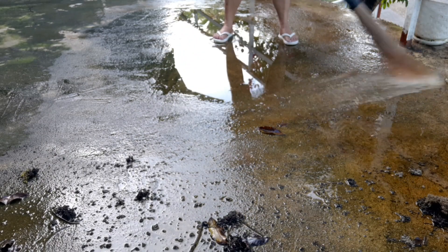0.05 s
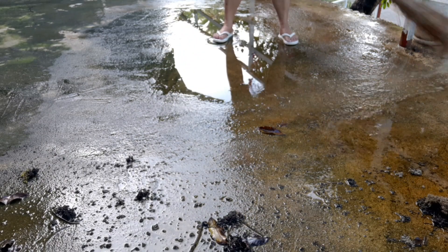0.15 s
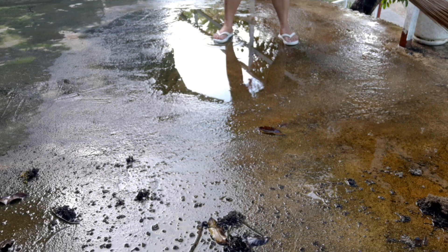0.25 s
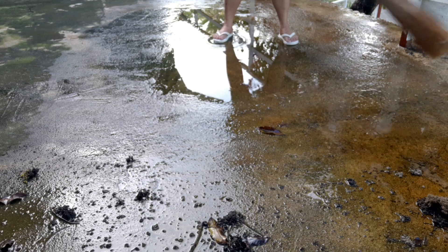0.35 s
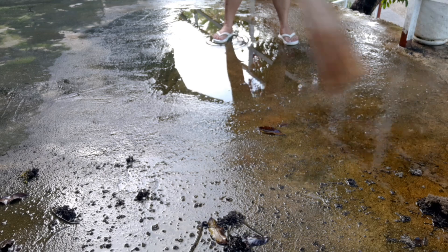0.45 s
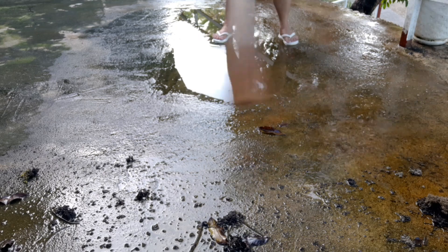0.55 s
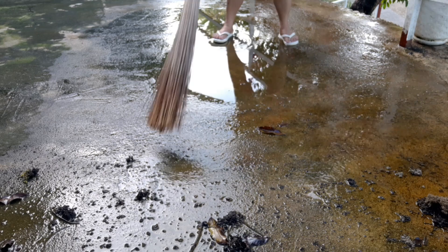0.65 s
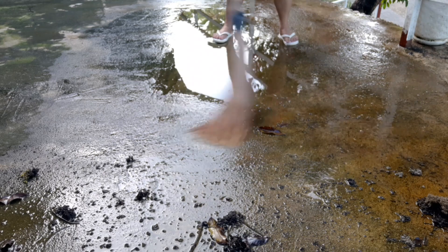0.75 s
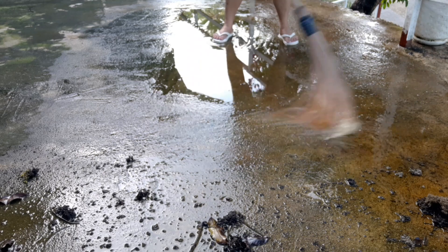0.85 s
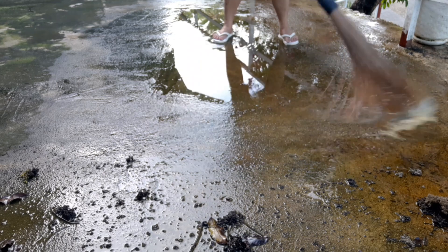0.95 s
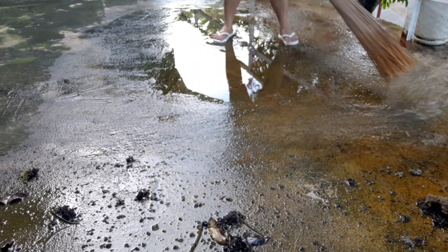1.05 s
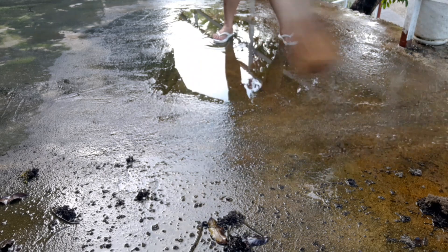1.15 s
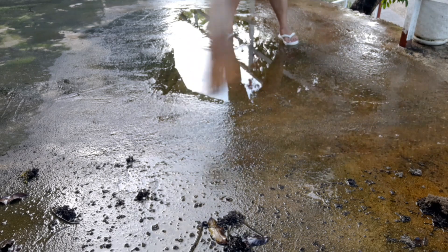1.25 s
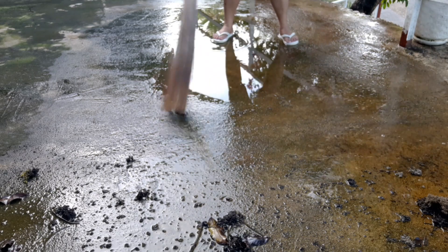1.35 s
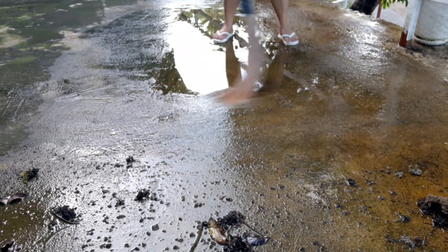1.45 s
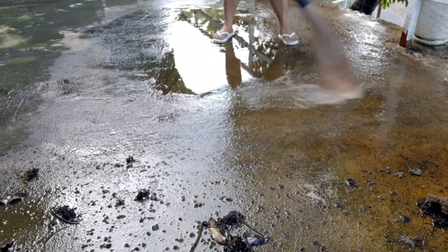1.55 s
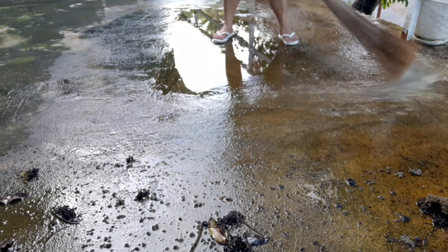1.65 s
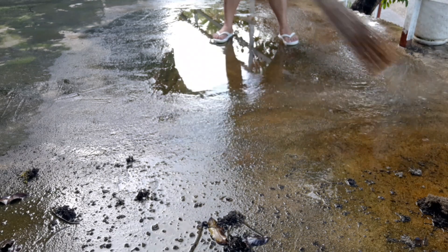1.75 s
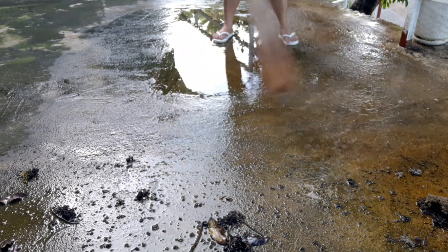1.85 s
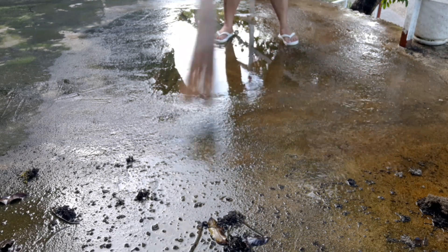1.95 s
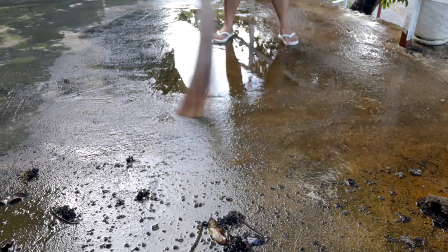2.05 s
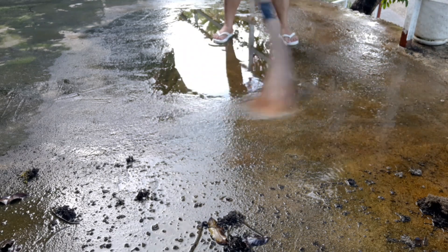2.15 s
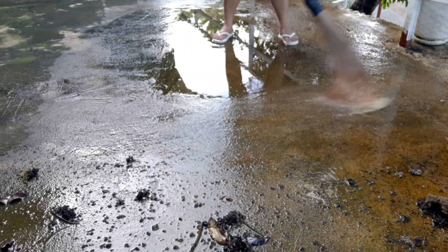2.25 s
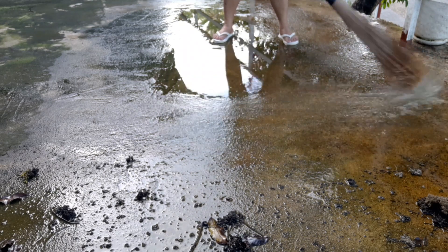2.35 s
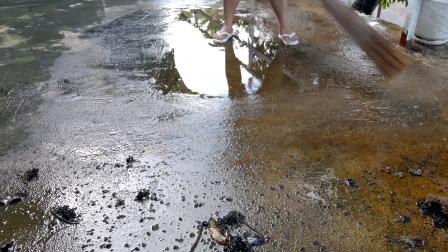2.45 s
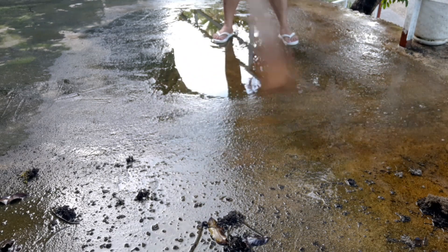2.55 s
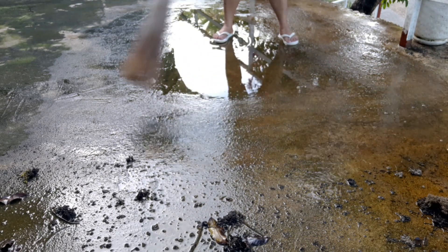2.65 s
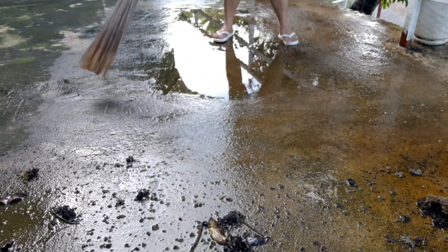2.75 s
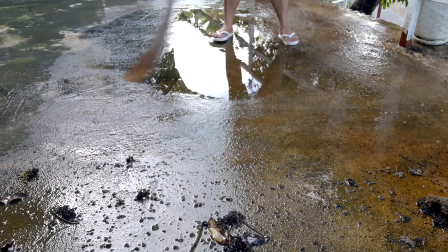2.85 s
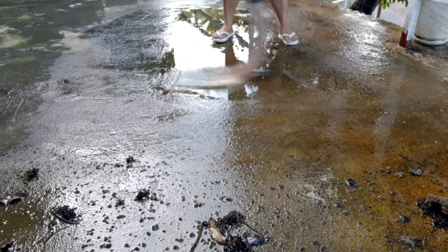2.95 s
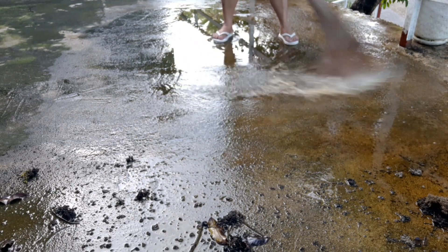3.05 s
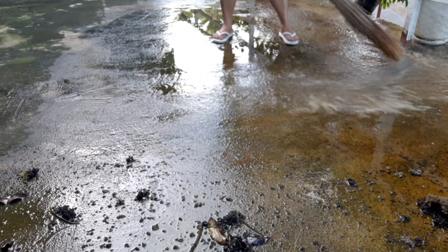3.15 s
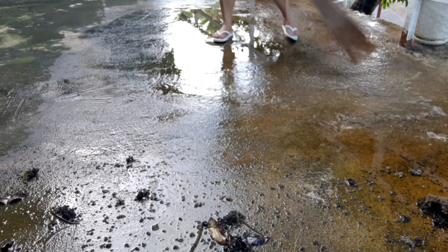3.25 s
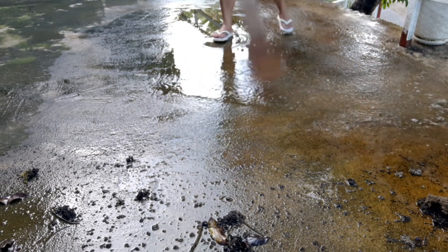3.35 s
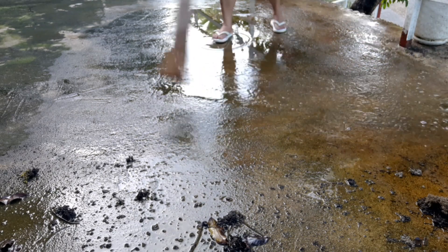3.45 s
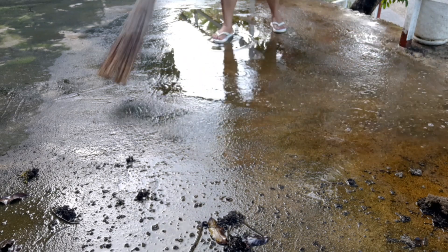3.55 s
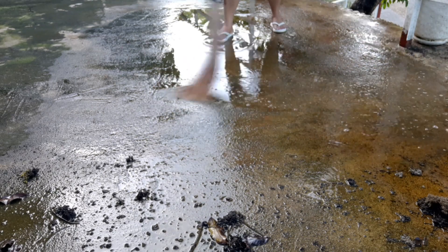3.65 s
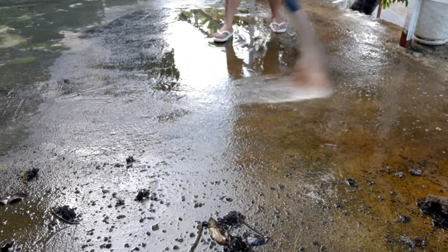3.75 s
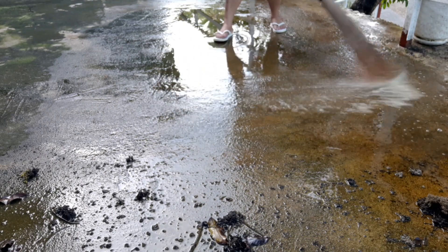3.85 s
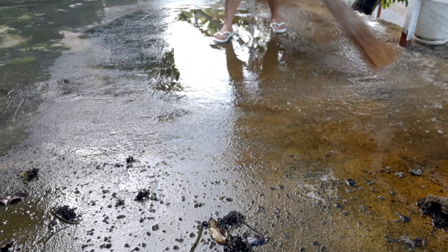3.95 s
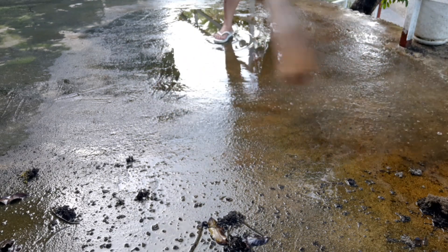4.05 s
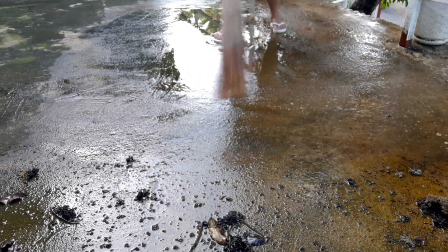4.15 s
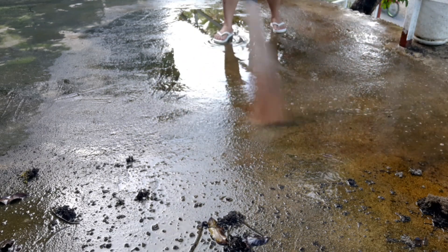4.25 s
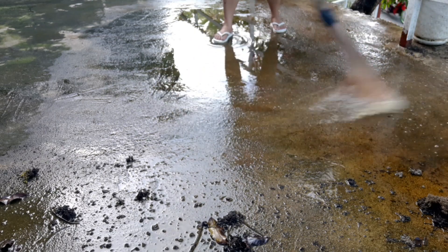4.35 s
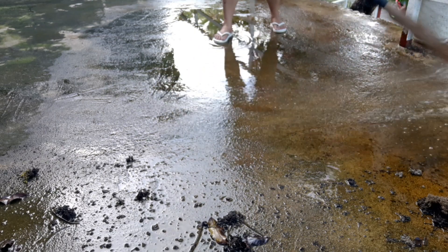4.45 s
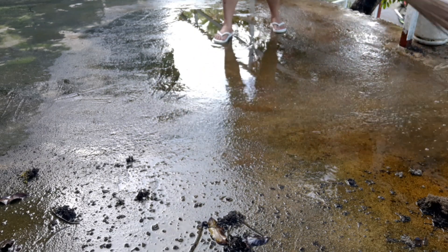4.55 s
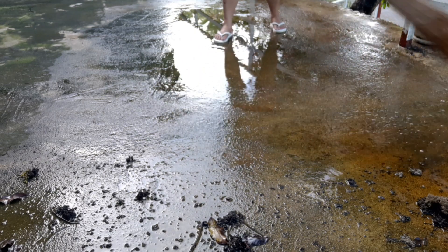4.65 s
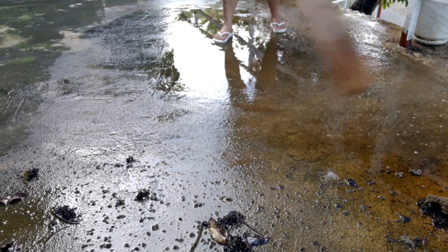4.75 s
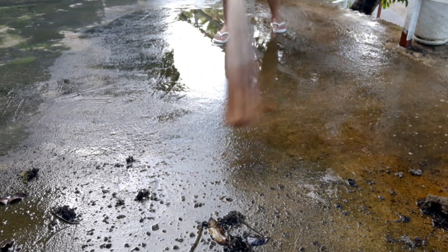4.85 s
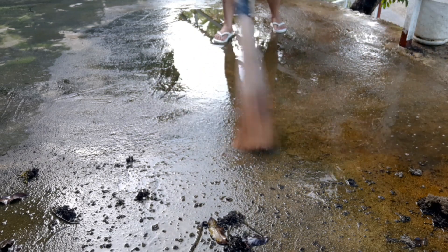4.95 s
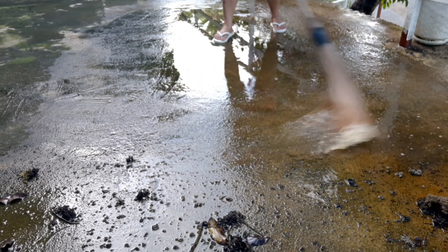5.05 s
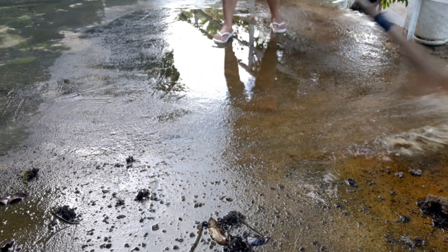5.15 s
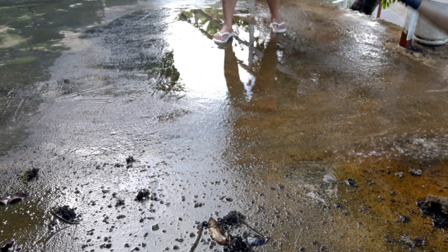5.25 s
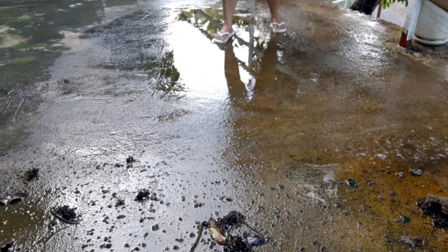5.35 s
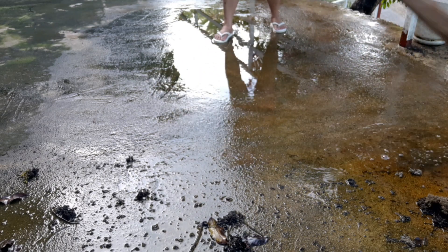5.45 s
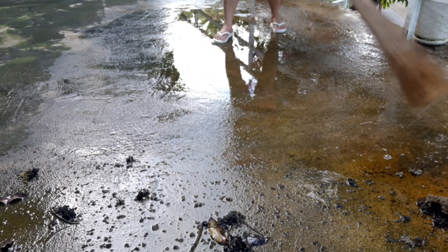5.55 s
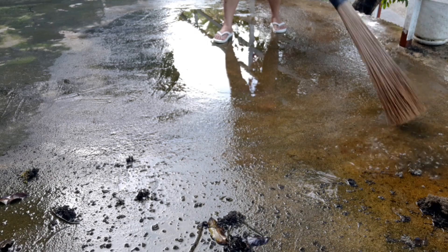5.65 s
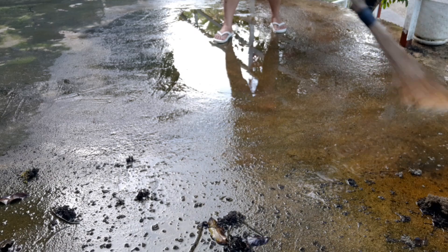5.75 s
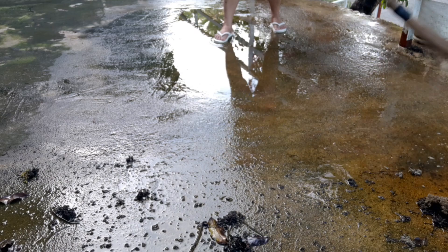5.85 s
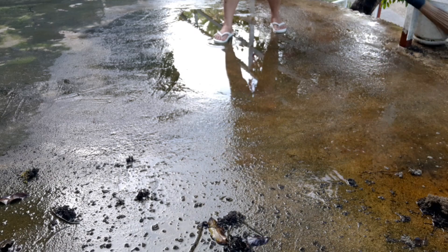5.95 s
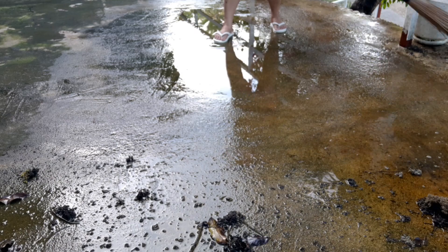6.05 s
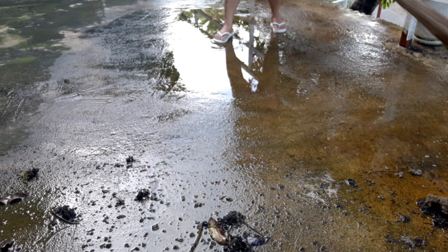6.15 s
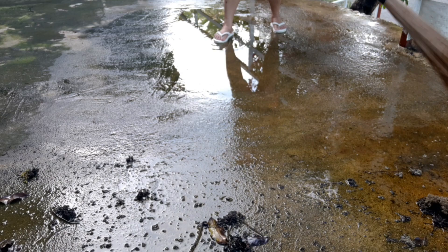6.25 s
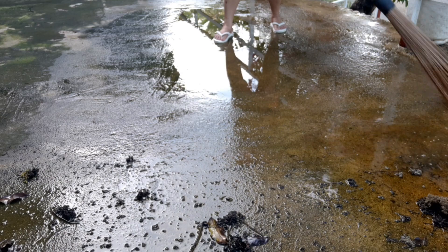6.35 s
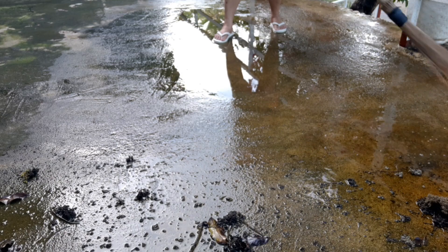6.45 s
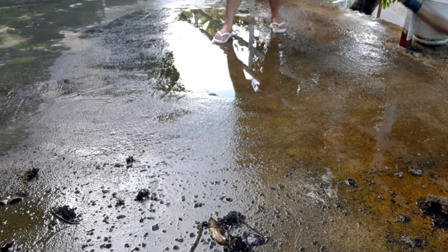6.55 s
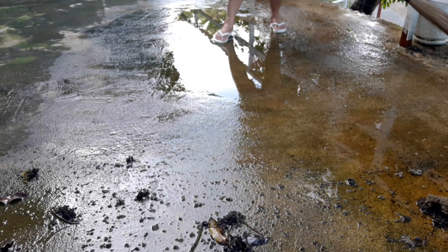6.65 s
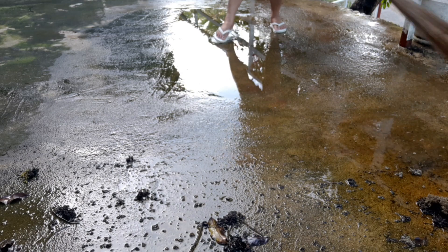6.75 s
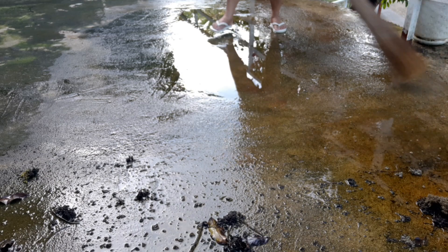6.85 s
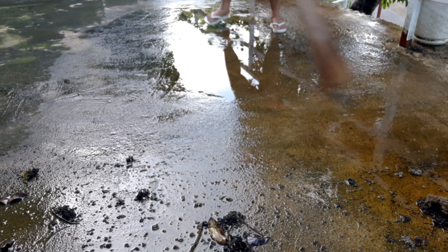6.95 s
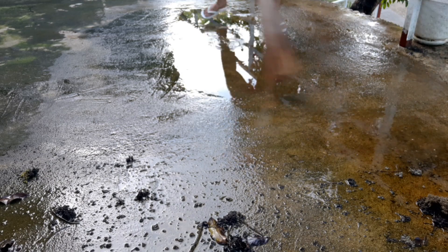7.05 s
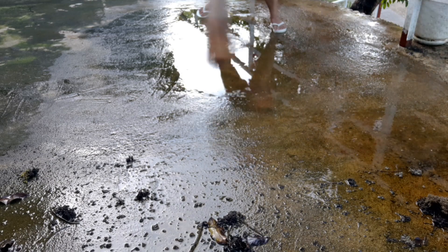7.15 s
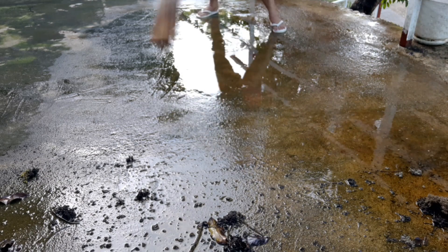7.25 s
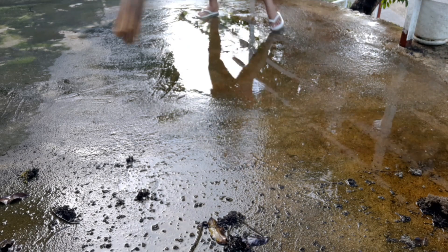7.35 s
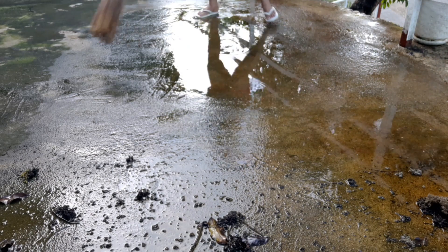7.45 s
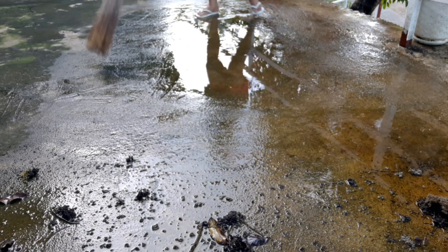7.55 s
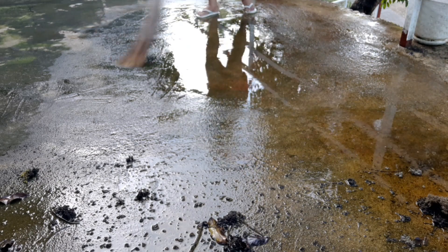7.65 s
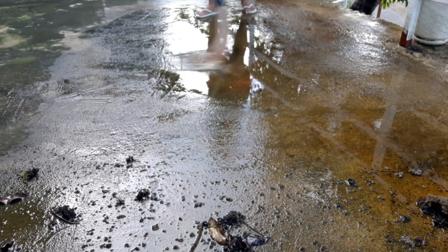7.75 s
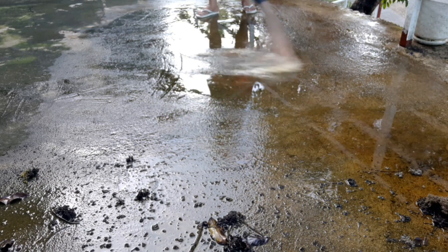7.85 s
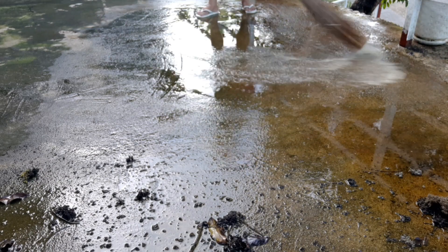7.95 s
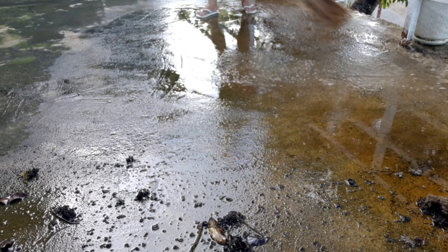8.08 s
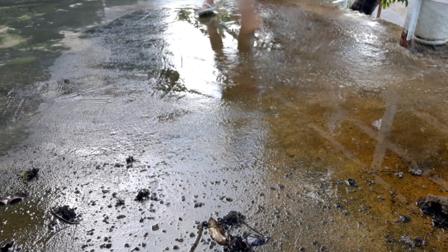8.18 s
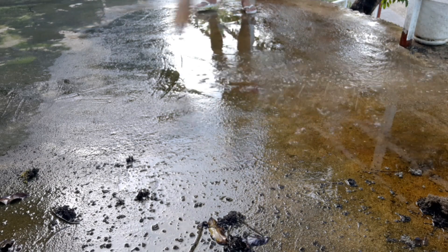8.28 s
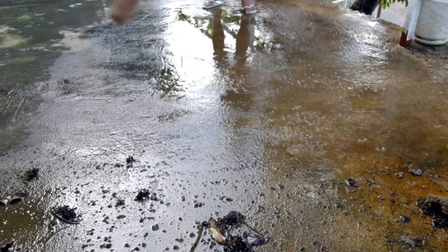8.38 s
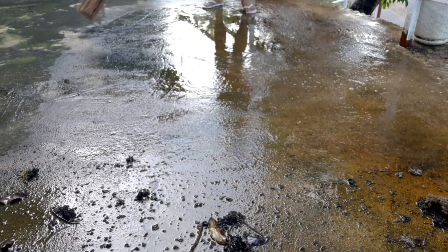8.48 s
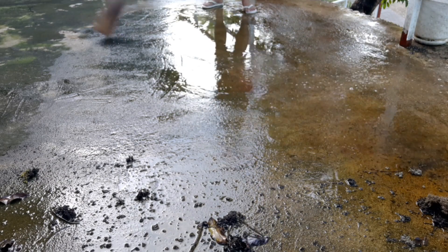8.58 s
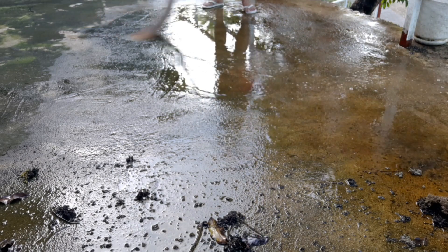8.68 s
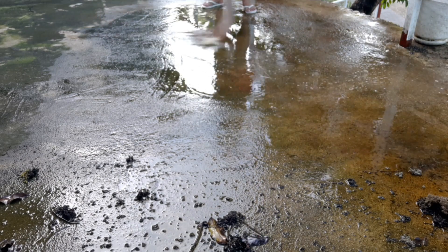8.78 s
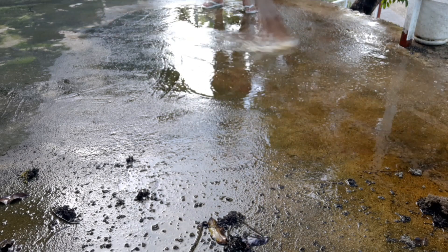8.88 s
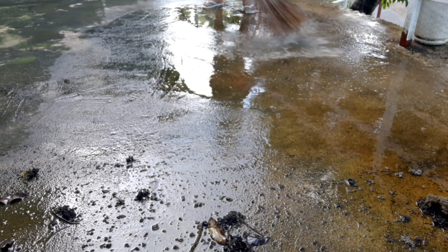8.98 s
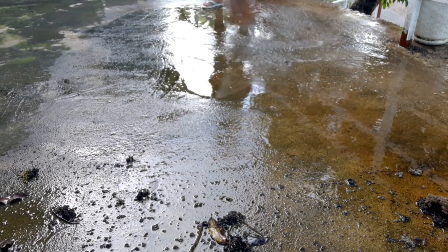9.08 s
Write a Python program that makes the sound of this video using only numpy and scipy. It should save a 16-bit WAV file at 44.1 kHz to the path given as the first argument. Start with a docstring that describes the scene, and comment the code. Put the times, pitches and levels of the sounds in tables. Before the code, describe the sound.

A stick broom sweeps water across a concrete yard in twelve strokes, from the very start until about 9 seconds. Each is a short, gritty, bubbling swish, followed by pattering spray and a brief echo from nearby walls. The strokes move across the stereo image, roughly 0.7 seconds apart, slowing for the last two at about 7.7 and 8.7 seconds. A distant engine hums low in traffic throughout, and a faint trickle on the left gradually fades. A bristle flicks sharply at 1.2 seconds, and birds call faintly between 1.8 and 2.9 seconds. From 4 seconds, occasional drops tick and plop. Near 5.9 and 6.6 seconds, flung water drums briefly on a hollow barrel. Faint bird calls return between 7 and 8.7 seconds, with a few more drops and a small cluster of plops around 8.4 seconds.

```python
"""A stick broom sweeps a wet concrete yard in twelve strokes, passing two microphones. From the start a far
engine hums in traffic and water trickles to the left. In each stroke the bristles scratch on grit, churn
bubbles and throw spray, and nearby walls answer briefly. A bristle flicks after a second, then birds call
faintly; from 4 s drops tick and plop. Near 5.9 s and 6.6 s flung water drums on a hollow barrel.
The birds return around the last two strokes, among a few more drops."""
import sys
import numpy as np
from scipy import signal
from scipy.fft import rfft, irfft, next_fast_len
from scipy.io import wavfile
from scipy.ndimage import uniform_filter1d, map_coordinates

SR = 44100
rng = np.random.default_rng(int(sys.argv[2]) if len(sys.argv) > 2 else 0)


def master(y):
    """Save y as 16-bit WAV."""
    cut = np.clip(np.atleast_2d(y).T, -1, 1)
    pcm = np.round(cut * 32767)  # scale
    wavfile.write(sys.argv[1], SR, pcm.astype(np.int16))


N = 402190

# the far engine's running: (time [s], firing rate [Hz], relative level [dB])
ENGINE_RUN = [(0, 113, -48), (1.3, 104, -49.5), (2.0, 111, -49), (2.55, 114.5, -45), (3.08, 109, -44.5),
              (3.4, 113, -48.5), (4.42, 130, -42), (5.0, 120.8, -42), (5.25, 146, -56), (5.6, 146.5, -40.5),
              (5.9, 149, -45), (6.12, 142, -36.5), (6.8, 132, -51), (7.3, 129, -38.5), (7.62, 126, -49),
              (7.8, 104, -48.5), (8.35, 88, -51.5), (9.12, 89, -52)]
# loudness of traffic rumble, traffic drone and trickle: (time [s], relative level [dB])
RUMBLE_LEVEL = [(0, -42), (2, -45), (6.1, -41.5), (7.8, -43.5), (9.12, -45)]
DRONE_LEVEL = [(0, -45.5), (2.8, -49), (4.2, -47.5), (6.1, -44.5), (7.6, -50), (7.8, -62.5)]
TRICKLE_LEVEL = [(0, -49.5), (2.8, -58), (3.6, -59), (7.3, -61), (9.12, -68)]
# a faint, nearly steady hiss: (time [s], relative level [dB])
HISS_LEVEL = [(0, -56), (3, -56), (6, -55.5), (9.12, -59.5)]
# spectra of the rumble, drone and hiss: (frequency [Hz], relative level [dB])
RUMBLE_SPECTRUM = [(20, -42), (35, -21), (55, -13), (80, -0.5), (110, -0.5), (142, -6), (175, -12),
                   (310, -13), (420, -17.5), (700, -21.5), (2000, -36.5)]
DRONE_SPECTRUM = [(95, -47), (125, 0), (150, -1), (170, -13), (230, -39), (600, -90)]
HISS_SPECTRUM = [(200, 2), (450, -5), (1000, 8), (2000, -1.5), (4000, -2), (7000, -5.5), (10000, -12),
                 (15000, -28)]
# likeness of the background at the two microphones: (frequency [Hz], correlation [-1 to 1])
COHERENCE = [(130, 0.96), (290, 0.87), (640, 0.34), (1400, -0.68), (3000, 0.018)]
# distant bird calls: (time [s], length [s], pitch [Hz], level [dB], quality factor [1])
BIRD_CALLS = [(1.758, 0.12, 1865, -52, 80), (1.999, 0.13, 1634, -56, 72), (2.652, 0.25, 2910, -63, 51),
              (7.036, 0.12, 4270, -55, 10), (7.389, .05, 4000, -57, 10), (8.296, 0.071, 4270, -52, 10),
              (8.51, 0.24, 1960, -61, 25)]
# reverberation of the yard: (frequency [Hz], 60 dB decay time [s])
YARD_DECAY = [(200, 0.23), (2000, 0.34), (6000, 0.35), (15000, 0.42)]
# a bristle flick (first row), then splats and gulps of water:
# (time [s], relative level [dB], resonance [Hz], ring gain [dB], 60 dB decay time [s])
FLICK_AND_DROPS = [(1.171, -26.5, 5200, -17, 0.1), (4.05, -35, 4500, -8, 0.11), (4.43, -40, 1060, 18, 0.4),
                   (5.13, -40, 870, 19, 0.51), (5.89, -40.5, 1050, 20.5, 0.33), (6.96, -46, 2800, -3, 0.38),
                   (7.408, -46, 2000, -4, 0.057), (8.415, -39.5, 1850, 4, 0.068),
                   (8.431, -37.5, 3370, 2, 0.07), (8.448, -34.5, 1330, 19.5, 0.015),
                   (8.452, -40.5, 1260, 11, 0.2), (8.514, -47, 2210, 9, 0.13)]
# flung water pattering on the barrel: (time [s], relative level [dB], 60 dB decay time [s])
BARREL_SPLASHES = [(5.945, -36.5, 0.66), (6.612, -37.5, 0.58)]
# the barrel's modes: (frequency [Hz], bandwidth [Hz], gain [dB])
BARREL_MODES = [(210, 36, 5), (285, 35, -2.5), (458, 49, -7.5), (630, 70, -6), (780, 130, -10.5),
                (1280, 230, -12)]
# spectra of the broom's three sounds: (frequency [Hz], relative level [dB])
CHURN_SPECTRUM = [(150, -24), (400, -28), (700, -12.5), (1000, -7), (1400, 3), (2100, 9), (3000, 10),
                  (5000, -10), (10000, -46)]
SCRAPE_SPECTRUM = [(500, -31.5), (1500, -20.5), (2200, -9), (2900, -2), (3800, 0.5), (4600, 0),
                   (6000, -2.5), (7500, -3.5), (9500, -9), (16000, -18)]
SPRAY_SPECTRUM = [(2000, -25), (4500, -10), (7000, -1), (9000, 0.5), (11500, 1), (15500, -1)]
# the strokes, with relative levels: (touches down [s], fully pressed [s], meets deep water [s],
#   digs in [s], lifts [s], scrape [dB], first graze below it [dB], lean into the stroke [dB], spray [dB],
#   churn [dB], wake [dB], wake length [s], bearing to the left when pressed [degrees])
BROOM_STROKES = [(-0.11, 0.015, 0.018, 0.092, 0.16, -20, 34, 3.5, -28, -33.5, -39.0, 0.47, 25),
                 (0.757, 0.858, 0.891, 0.985, 1.015, -24.5, 26, -0.5, -28, -37.0, -43.0, 0.46, 6.5),
                 (1.404, 1.515, 1.544, 1.624, 1.664, -23, 24.5, 6, -29.0, -33.0, -42.5, 0.6, 2),
                 (2.083, 2.207, 2.237, 2.273, 2.368, -23.5, 26, 0.5, -26.5, -37.5, -44.0, 0.38, 10.5),
                 (2.87, 2.971, 3.007, 3.105, 3.157, -25.5, 23, 6.5, -29, -36.5, -36.0, 0.34, -5),
                 (3.659, 3.764, 3.767, 3.83, 3.913, -22, 22, 1.0, -27.5, -34.5, -45.0, 0.82, 5),
                 (4.29, 4.383, 4.394, 4.457, 4.507, -21.5, 25.5, 0, -25.5, -33.5, -49.0, 0.77, 27),
                 (4.977, 5.072, 5.097, 5.187, 5.27, -25.5, 25, 2.5, -31.5, -36.0, -45.0, 0.86, 21),
                 (5.708, 5.84, 5.86, 5.892, 5.969, -23.5, 29, -11, -29.0, -37.5, -38.5, 0.27, 55),
                 (6.365, 6.501, 6.52, 6.539, 6.6, -24.5, 31, 1, -30, -42.5, -43, 0.5, 67),
                 (7.653, 7.788, 7.818, 7.797, 8.013, -23, 36, -3, -29.0, -34.0, -41.0, 0.43, -17),
                 (8.659, 8.805, 8.849, 8.824, 8.981, -23.5, 27.0, -4, -28, -34.0, -37.5, 0.77, -10.5)]
# response shared by the two microphones: (frequency [Hz], gain [dB])
MIC_RESPONSE = [(6300, 1), (7300, 4), (7800, -2), (8400, -6), (9200, -5), (11000, -2.5), (15100, -2.5),
                (15700, -4)]
# their imbalance: (frequency [Hz], left minus right [dB])
MIC_BALANCE = [(1000, 0), (2000, 0.7), (4500, -1.1), (8000, 0.6), (12000, 1.5)]

TOUCH_S, LIFT_DB_PER_S = 0.028, 370  # the bristle tips meet the ground, and leave it
PRESS_CURVE, EARLY_SPRAY_DB = 1.27, 10.5  # pressure builds; a light graze is mostly spray
CHURN_GRAZE_DB, WAVE_CURVE = 20, 2.4  # the bow wave builds late and steeply
SPEED_ARCH_DB, WAVE_ARCH_DB = 0.28, 2.5  # fastest and deepest in mid-stroke
DIG_DB, DIG_S = 2, 0.017  # once in a stroke the bristles bite briefly harder
WAVE_BREAK_S = 0.012  # the wave runs off this long before the lift
WAKE_DB_PER_S, WAKE_SPRAY_DB, WAKE_CHURN_DB = 42, -3, -7  # flung water patters down behind the stroke
WAKE_CLUMP_DB = 1.63  # it lands in clumps
TIP_CHURN_DB, FAN_CHURN_DB = 3.5, -3  # the water is churned mostly at the tip
SWING_DEG_PER_S, MIC_DELAY_MS = 207, 0.29  # the broom's arc; travel time between the microphones
BAND_LIMIT_HZ = 15600


def amp(db):
    """Decibels to amplitude ratio."""
    return 10 ** (np.asarray(db) / 20)


def unit(x):
    """Normalisation to rms 1."""
    return x / np.sqrt(np.mean(x ** 2) + 1e-20)


def along(points, hz):
    """Interpolation of (frequency [Hz], value) points on a logarithmic axis."""
    knots_hz, values = np.transpose(points)
    return np.interp(np.log(hz + 1), np.log(knots_hz + 1), values)


def curves(rows):
    """Linear interpolation, sample by sample, of each column after the time."""
    times, *columns = np.transpose(rows)
    return [np.interp(np.arange(N) / SR, times, column) for column in columns]


def clock():
    """A coarse time axis for gestures, one step a millisecond."""
    return np.arange(0, N / SR, 0.001)


def ramp(start, end):
    """A linear rise from 0 at start to 1 at end."""
    return np.clip((clock() - start) / max(end - start, 1e-3), 0, 1)


def fade(start, db_per_s):
    """Exponential decay from a gain of 1, beginning at start."""
    return amp(-db_per_s * np.maximum(clock() - start, 0))


def wobble(rate):
    """Slow fluctuation: a spline through random knots, rate of them a second."""
    knots = rng.standard_normal(int(N * rate / SR) + 4)
    return map_coordinates(knots, [np.arange(N) * rate / SR])


def filtered(x, response):
    """Linear filtering: the spectrum of x times a frequency response."""
    size = next_fast_len(N + SR // 2)
    return irfft(rfft(x, size) * response(np.fft.rfftfreq(size, 1 / SR)), size)[..., :N]


def coloured(x, spectrum):
    """Spectral shaping by (frequency [Hz], level [dB]) points, at rms 1."""
    return unit(filtered(x, lambda hz: amp(along(spectrum, hz))))


def clicks(rate, scatter_db):
    """Shot noise: random tiny impacts of scattered size, equal in power at any rate a second."""
    chance = np.clip(rate / SR, 1e-4, 1)
    sizes = rng.standard_normal(N) * amp(scatter_db * rng.standard_normal(N))
    return unit((rng.random(N) < chance) * sizes / np.sqrt(chance))


def bubbles(density, centre_hz, spread, cycles, count):
    """Bubble resonance: each rings down 60 dB in the given cycles, rising in pitch near the surface."""
    start = np.searchsorted(np.cumsum(density) / density.sum(), rng.random((count, 1)))
    pitch, size = rng.standard_normal((2, count, 1))
    t = np.arange(SR // 80) / SR
    turns = np.minimum(centre_hz * np.exp(spread * pitch), SR / 4) * t
    age = turns / cycles
    rise = 1 + 0.095 * np.minimum(age, 1)
    rings = amp(0.98 * size - 60 * age) * np.sin(2 * np.pi * turns * rise)
    froth = np.bincount((start + np.arange(len(t))).ravel(), rings.ravel(), N)[:N]
    return unit(froth / np.sqrt(density))  # even in power at any density


def outdoors(spectrum):
    """Partial coherence: background noise at two points is nearly alike at long wavelengths."""
    def mid_and_side(hz):
        angle = np.arccos(np.clip(along(COHERENCE, hz), -1, 1)) / 2
        return np.array([np.cos(angle), np.sin(angle)])
    mid, side = filtered(rng.standard_normal((2, N)), mid_and_side)
    return coloured(np.array([mid + side, mid - side]), spectrum)


def engine(rumble_db):
    """Periodic firing gives a harmonic series; unequal firings spread sidebands around the note."""
    firing_hz, engine_db = curves(ENGINE_RUN)
    phase = 2 * np.pi * np.cumsum(firing_hz * (1 + 0.0041 * wobble(12))) / SR
    harmonics = np.sin(phase) + amp(-22.5) * np.sin(2 * phase) + amp(-24.5) * np.sin(3 * phase)
    sidebands = wobble(50) * np.sin(phase) + wobble(50) * np.cos(phase)
    hum = amp(engine_db - 2.5 + 0.95 * wobble(6.1)) * unit(harmonics)
    return hum + amp(rumble_db - 12.5) * unit(sidebands)


def background():
    """Incoherent sources add in power: the engine, traffic rumble and drone, and a faint hiss."""
    rumble_db, = curves(RUMBLE_LEVEL)
    drone_db, = curves(DRONE_LEVEL)
    hiss_db, = curves(HISS_LEVEL)
    traffic = engine(rumble_db) + amp(rumble_db - 3) * outdoors(RUMBLE_SPECTRUM)
    traffic += amp(drone_db) * outdoors(DRONE_SPECTRUM)
    return traffic * amp([[.8], [-.8]]) + amp(hiss_db) * outdoors(HISS_SPECTRUM)


def birds():
    """Narrow-band noise: thin calls, blurred by distance into puffs of sound around one pitch."""
    t, out = np.arange(SR // 4) / SR, np.zeros((2, N))
    for start, length, hz, db, quality in BIRD_CALLS:
        whistle = signal.lfilter(*signal.iirpeak(hz, quality, fs=SR), rng.standard_normal((2, len(t))))
        swell = np.sin(np.pi * np.minimum(t / length, 1))
        out[:, round(start * SR):][:, :len(t)] += amp(db) * swell * unit(whistle)
    return out


def trickle():
    """Running water fizzes by bubble resonance; the shorter path brings it to the left microphone first."""
    trickle_db, = curves(TRICKLE_LEVEL)
    fizz = bubbles(np.ones(N), centre_hz=2200, spread=0.36, cycles=11, count=5000)
    wash = coloured(rng.standard_normal(N),
                    spectrum=[(400, -32), (1000, 3), (2300, -3), (3500, -2), (7000, -26), (12000, -21)])
    flow = amp(trickle_db) * unit(0.89 * fizz + wash)
    lead_ms, sides = 0.45, np.array([[1], [-1]]) / 2
    return filtered(flow, lambda hz: np.exp(2j * np.pi * hz * sides * lead_ms / 1000))


def echoes(x):
    """Reverberation: the yard's reflections differ at each microphone and change as the source moves."""
    out, hop = np.zeros((2, N + SR)), SR // 4
    for start in range(0, N, hop):
        hz, t, noise = signal.stft(rng.standard_normal((2, SR // 2)), SR, nperseg=256)
        decay = amp(-60 * t / along(YARD_DECAY, hz)[:, None])
        tail = signal.istft(noise * decay, SR, nperseg=256)[1]
        answer = signal.fftconvolve(x[None, start:start + hop], tail / np.linalg.norm(tail[0]), axes=1)
        out[:, start:start + answer.shape[1]] += answer
    return out[:, :N]


def flick_and_drops():
    """Impact excites resonance: a bristle flicks brightly, and each drop rings a pocket of water."""
    t, out = np.arange(SR // 4) / SR, np.zeros((2, N + SR))
    for start, db, hz, ring_db, t60 in FLICK_AND_DROPS:
        burst = rng.standard_normal((2, len(t))) * amp(-60 * t / t60)
        band_hz = [1.1 * hz, min(6 * hz, SR / 2.5)]
        impact = signal.lfilter(*signal.butter(1, band_hz, "bandpass", fs=SR), burst)
        ring = signal.lfilter(*signal.iirpeak(hz, Q=4, fs=SR), burst[0])
        out[:, round(start * SR):][:, :len(t)] += amp(db) * (impact + amp(ring_db) * ring)
    return out[:, :N]


def barrel():
    """Forced vibration: a dying patter of flung water drives the damped modes of a hollow wall."""
    def wall(hz):
        return sum((-1) ** k * amp(db) * 1j * hz * width / (mode_hz ** 2 - hz ** 2 + 1j * hz * width)
                   for k, (mode_hz, width, db) in enumerate(BARREL_MODES))
    t, force = np.arange(N) / SR, np.zeros(N)
    for start, db, t60 in BARREL_SPLASHES:
        age = np.maximum(t - start, 0)
        force += amp(db - 60 * age / t60) * (1 - np.exp(-age / 0.007))
    return amp(21.5) * filtered(force * clicks(1500, scatter_db=3), wall)


def contact(touch, pressed, lift, graze_db, curve, arch_db, lean_db):
    """Friction noise follows pressure: a graze, a build-up, an arch leaning early or late, the lift."""
    progress = ramp(pressed, lift)
    pressure_db = graze_db * (ramp(touch, pressed) ** curve - 1)
    sweep_db = arch_db * np.sin(np.pi * progress) + lean_db * (progress - .5)
    return ramp(touch, touch + TOUCH_S) * amp(pressure_db + sweep_db) * fade(lift, LIFT_DB_PER_S)


def stroke_gains():
    """Strokes and their wakes of falling water add in power, giving gains of scrape, spray and churn."""
    clumps = amp(WAKE_CLUMP_DB * np.interp(clock(), np.arange(N) / SR, wobble(25)))
    wake_shares = amp([0, WAKE_SPRAY_DB, WAKE_CHURN_DB])
    power = 0
    for (touch, pressed, deep, digs, lift, scrape_db, graze_db, lean_db,
         spray_db, churn_db, wake_db, wake_s, _) in BROOM_STROKES:
        bite_db = DIG_DB * np.exp(-((clock() - digs) / DIG_S) ** 2)
        shape = PRESS_CURVE, SPEED_ARCH_DB, lean_db
        scrape = amp(scrape_db + bite_db) * contact(touch, pressed, lift, graze_db, *shape)
        spray = amp(spray_db + bite_db) * contact(touch, pressed, lift, graze_db - EARLY_SPRAY_DB, *shape)
        bow_wave = contact(touch, deep, lift - WAVE_BREAK_S, CHURN_GRAZE_DB, WAVE_CURVE, WAVE_ARCH_DB, 0)
        churn = amp(churn_db) * bow_wave
        settling = fade(lift, WAKE_DB_PER_S) * (1 - ramp(lift, lift + wake_s))
        wake = amp(wake_db) * clumps * ramp(pressed, lift) * settling
        power = power + np.square([scrape, spray, churn]) + np.outer(wake_shares, wake) ** 2
    gains = np.sqrt(power) + amp(-80)
    return curves(np.transpose([clock(), *gains]))


def swish(scrape_gain, spray_gain, churn_gain):
    """Bristles catch on grit, churn bubbles and fling spray; the impacts merge into shot noise."""
    rate = 3000 + 36000 * scrape_gain / scrape_gain.max()  # dense in hard strokes, sparse in their wakes
    froth = bubbles(np.sqrt(churn_gain), centre_hz=1537, spread=0.606, cycles=19, count=6000)
    churn = amp(3) * churn_gain * coloured(froth, CHURN_SPECTRUM)
    scrape = amp(2.5) * scrape_gain * coloured(clicks(rate, scatter_db=2), SCRAPE_SPECTRUM)
    spray = amp(7) * spray_gain * coloured(clicks(rate, scatter_db=0.5), SPRAY_SPECTRUM)
    return churn + scrape + spray


def swing(x):
    """Path difference: as the broom swings leftward, its sound reaches the left microphone ever earlier."""
    path = []
    for touch, pressed, _, _, lift, *_, bearing in BROOM_STROKES:
        path += [(touch, bearing), (pressed, bearing), (lift, bearing + SWING_DEG_PER_S * (lift - pressed))]
    degrees, = curves(path)
    lead_samples = MIC_DELAY_MS / 1000 * SR * np.sin(np.radians(degrees))
    return np.array([map_coordinates(x, [np.arange(N) + side * lead_samples], order=5)
                     for side in (.5, -.5)])


def pockets(x, depth_db):
    """Time-varying filtering: pockets of air and water each colour the sound for hundredths of a second."""
    spectra = signal.stft(x, nperseg=512)[2]
    patches = uniform_filter1d(rng.standard_normal(spectra.shape[1:]), size=4, axis=0)  # over frequency
    patches = uniform_filter1d(patches, size=6, axis=1)  # over time
    return signal.istft(spectra * amp(depth_db * unit(patches)), nperseg=512)[1][:, :N]


def broom():
    """The tip is a point source; the fan of bristles and water around it is an extended, diffuse one."""
    scrape, spray, churn = stroke_gains()
    tip = swing(swish(scrape, spray, amp(TIP_CHURN_DB) * churn))
    fan = np.array([swish(scrape, spray, amp(FAN_CHURN_DB) * churn) for microphone in range(2)])
    judder = amp(0.82 * wobble(45))  # the bundle grips and slips as a whole
    return judder * pockets(amp(-6) * tip + amp(-2) * fan, depth_db=2)


def scene():
    """Superposition of the direct sweeping, its reflections from the walls and the background."""
    direct = broom() + flick_and_drops() + barrel()
    sweeping = (direct + amp(-9.5) * echoes(direct[0])) * amp([[.2], [-.2]])
    return sweeping + trickle() + birds() + background()


def record(dry):
    """Frequency response: the band-limited microphones peak near 7 kHz, the left one brighter on top."""
    def response(hz):
        sides = np.array([[1], [-1]]) / 2
        return amp(along(MIC_RESPONSE, hz) + sides * along(MIC_BALANCE, hz)) * (hz < BAND_LIMIT_HZ)
    return filtered(dry, response)


dry = scene()
out = record(dry)
master(out)
```